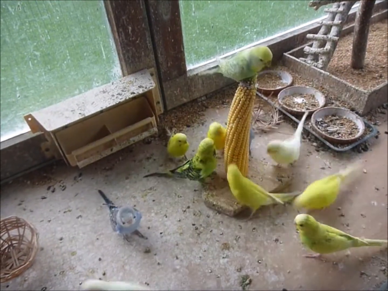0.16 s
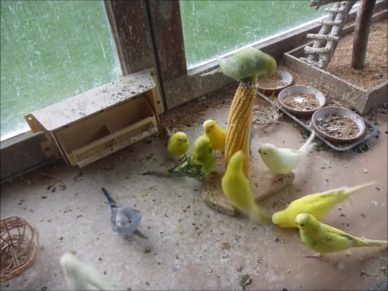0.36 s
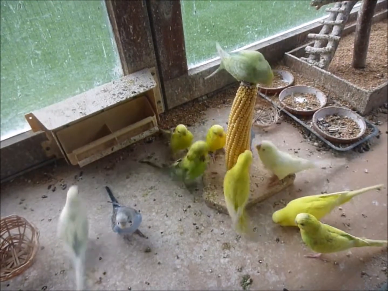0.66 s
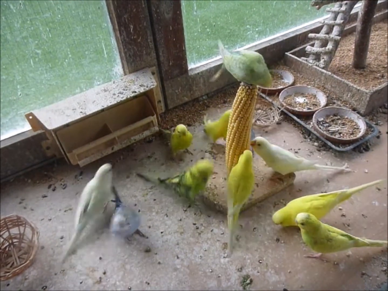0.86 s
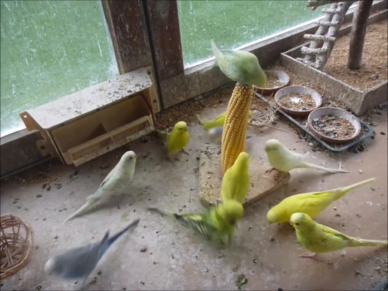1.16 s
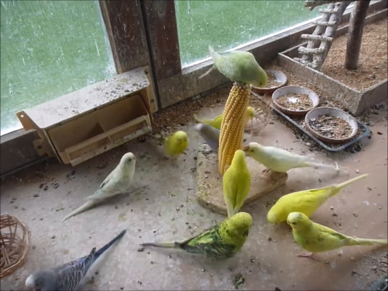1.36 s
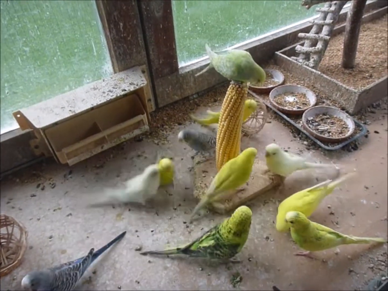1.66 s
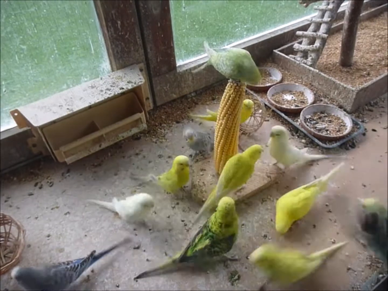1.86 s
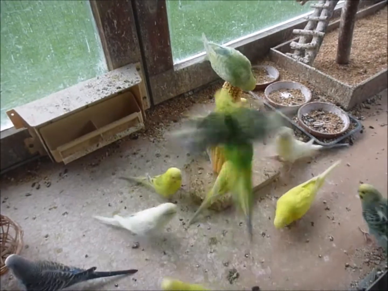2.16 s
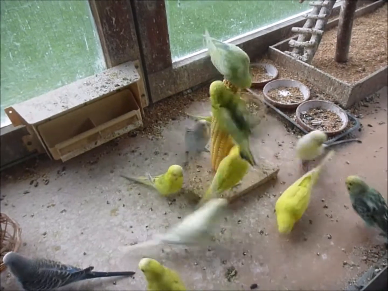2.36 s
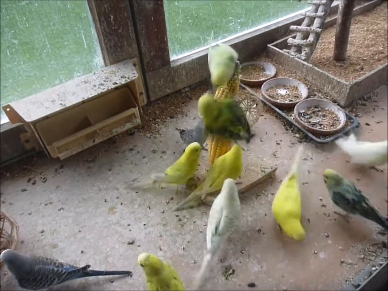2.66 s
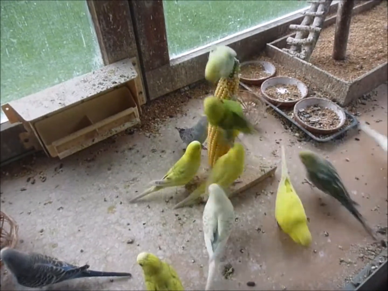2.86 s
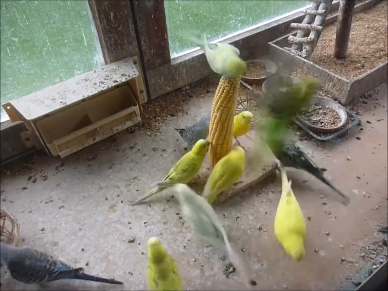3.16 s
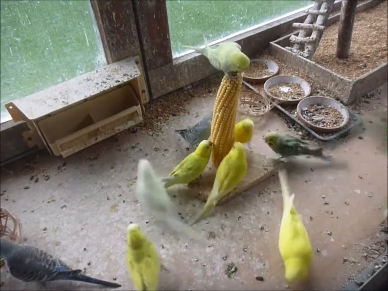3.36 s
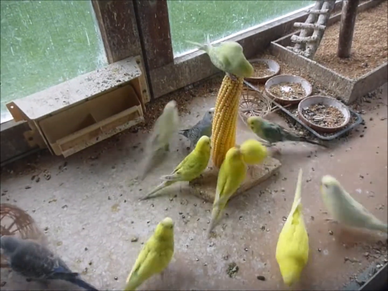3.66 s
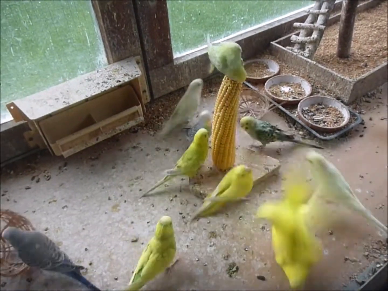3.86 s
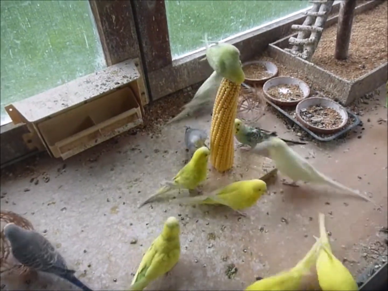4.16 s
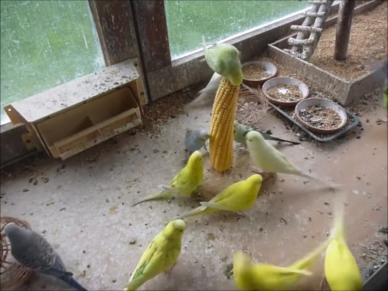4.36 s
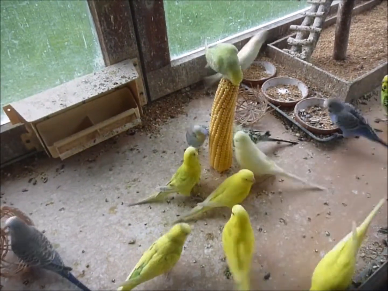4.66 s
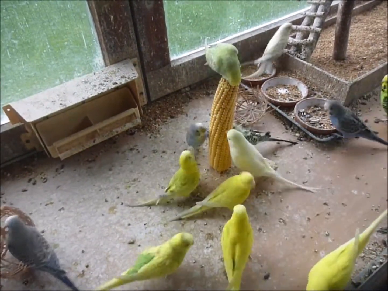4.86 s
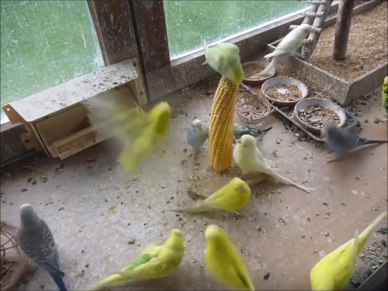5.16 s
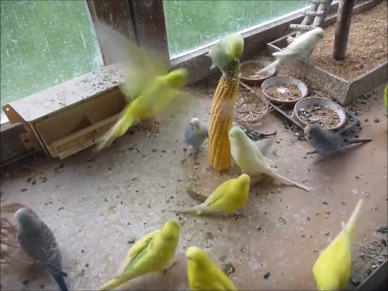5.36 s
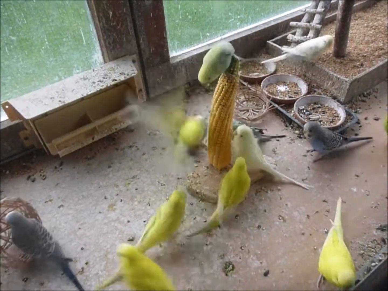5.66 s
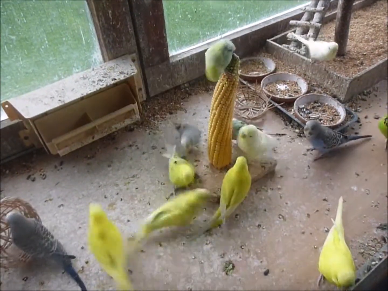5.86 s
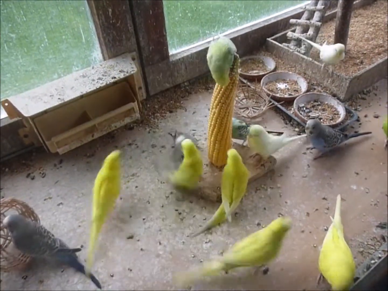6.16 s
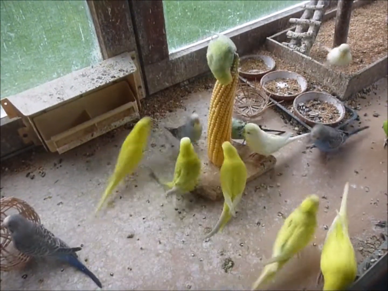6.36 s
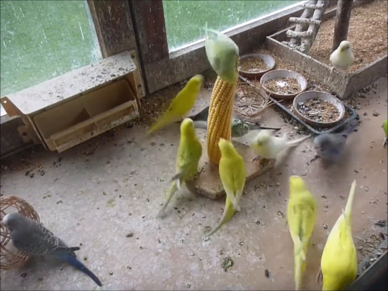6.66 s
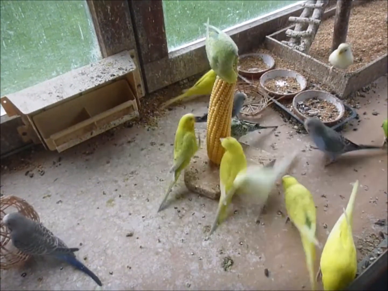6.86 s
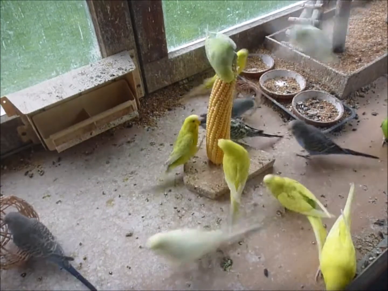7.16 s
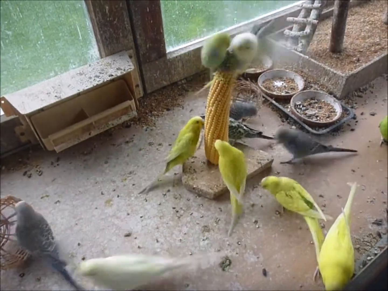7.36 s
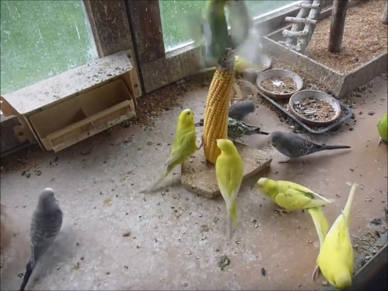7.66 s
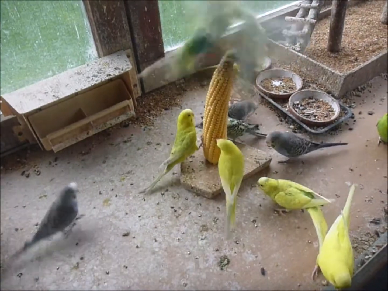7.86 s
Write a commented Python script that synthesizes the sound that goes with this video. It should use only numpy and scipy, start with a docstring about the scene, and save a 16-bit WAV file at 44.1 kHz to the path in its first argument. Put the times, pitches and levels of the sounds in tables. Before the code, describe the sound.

Close, nearly mono indoor pickup of small parrots feeding. Rapid scratchy chirps and bright gliding whistles crowd over a continuous far warble, faint pecking ticks, feather shuffle and quiet room air. Fluttering flights pass, strongest around three seconds and at the end, with low air gusts and light knocks. After seven seconds the flock sinks, leaving sparse short nasal calls and a firm landing thump.

```python
"""Budgerigars squabble around a corn cob on the floor of a small indoor aviary, heard almost in mono.
From the first moment a far flock warbles over faint room air, feather shuffle and pecking; close by,
rasps and gliding whistles overlap. Landings soon knock, and flights whirr and push low gusts of air.
Nasal yelps join after 2.5 s and are the last near calls, as the flock sinks and a hard landing knocks.
Calls are pitch-swept oscillators, wings and air are shaped noise; hard walls add a short echo."""
import sys
import numpy as np
from scipy import signal
from scipy.fft import rfft, irfft, next_fast_len
from scipy.io import wavfile

SR = 44100
rng = np.random.default_rng(int(sys.argv[2]) if len(sys.argv) > 2 else 0)


def to_wav(sig):
    """Store sig (one row per channel, or 1-D mono) as 16-bit WAV at the path in sys.argv[1].

    Samples outside -1..1 are clipped; the rate is SR.
    """
    pcm = np.clip(np.atleast_2d(sig), -1, 1) * 32767
    pcm = np.round(pcm).astype(np.int16)
    wavfile.write(sys.argv[1], SR, pcm.T)  # frames by channels


N = 354123
TIME = np.arange(N) / SR
EDGE_HZ = 15700  # top of the recorded band

# All event and flock levels are relative, ahead of the gains of the mix.
# near squawks: start_s, length_s, level_db, treble_db
NEAR_RASPS = [(0.005, 0.087, -27, -14), (0.128, 0.047, -21, -17), (0.434, 0.035, -22.5, -36),
              (0.637, 0.032, -24, -34.5), (0.759, 0.034, -21, -3), (0.847, 0.028, -15.5, -14),
              (0.929, 0.04, -21, -18), (0.983, 0.03, -18, -26.5), (1.039, .039, -19, -19.5),
              (1.098, 0.035, -19.5, -23), (1.157, 0.036, -19.5, -17.5), (1.217, .028, -18.5, -15),
              (1.264, 0.097, -22.5, -11.5), (1.383, 0.015, -16, -21), (1.411, 0.042, -20.5, -18),
              (1.502, .027, -17, -16), (1.555, 0.042, -20.5, -25.5), (1.625, 0.056, -20, -16.5),
              (1.703, 0.031, -20, -22.5), (1.911, 0.036, -24, -20), (1.954, .02, -17.5, -8),
              (2.033, 0.066, -18, -1.5), (2.239, 0.063, -19.5, -7.5), (2.334, 0.066, -20, -6.5),
              (2.475, 0.027, -26.5, 1.5), (2.536, .04, -19.5, -8), (2.676, 0.036, -22, -16),
              (2.741, 0.024, -26, -2.5), (2.791, 0.041, -20, -15), (3.071, 0.038, -21.5, -1),
              (3.315, 0.11, -25, -20.5), (3.447, .018, -20, -6.5), (3.667, 0.084, -23, -18),
              (3.828, 0.049, -21, -16), (3.92, 0.084, -21.5, -22), (4.04, 0.036, -18, -15),
              (4.08, 0.069, -20.5, -5.5), (4.236, 0.043, -24.5, -23), (4.374, 0.066, -21.5, 0),
              (4.547, 0.061, -20.5, 0), (4.651, 0.064, -18.5, 0), (4.741, 0.033, -20, -14),
              (4.829, 0.034, -17.5, -13), (4.874, 0.033, -25, -21.5), (4.929, .043, -20, -14.5),
              (4.994, .021, -17.5, -21), (5.052, .027, -20.5, -15), (5.179, 0.04, -18, -12.5),
              (5.384, 0.031, -19, -8.5), (5.438, 0.03, -19, -16), (5.479, 0.05, -18, -12.5),
              (5.56, 0.024, -23, -14), (5.607, 0.041, -22.5, -10), (5.721, 0.049, -21.5, -14),
              (5.802, .025, -18.5, -17), (5.828, 0.069, -26, -3), (5.948, .056, -21, -6),
              (6.075, .068, -25, -9), (6.163, 0.039, -21.5, -6.5), (6.243, 0.016, -23, -19),
              (6.29, .052, -24, -22), (6.38, 0.02, -22.5, -5), (6.436, 0.026, -21.5, -11),
              (6.486, 0.047, -21.5, -16.5), (6.713, 0.037, -27, -9.5), (7.072, .072, -17.5, -1.5),
              (7.231, 0.11, -29, -18)]
# near whistles: start_s, length_s, level_db, pitch_hz (middle), slide_octaves
NEAR_CHIRPS = [(0.005, .041, -23, 3440, .23), (0.047, .018, -17, 3730, 0.012),
               (0.086, .022, -22, 3890, -0.086), (0.17, 0.038, -21, 2520, -.24),
               (0.221, 0.078, -25.5, 3830, -0.29), (0.328, .061, -22.5, 2397, 0.13),
               (0.418, 0.032, -20, 2410, -0.31), (0.735, .039, -20.5, 2186, 0.06),
               (0.764, 0.019, -16, 2830, 0.12), (1.059, .02, -16, 3070, 0.65),
               (1.162, 0.047, -21, 2640, 0.12), (1.204, 0.048, -20.5, 2550, .39),
               (1.289, 0.048, -20, 3310, 0.43), (1.411, 0.04, -20.5, 2460, -0.25),
               (1.626, 0.032, -21, 2480, .24), (1.703, 0.027, -16.5, 2700, 0.57),
               (1.807, 0.021, -20, 3160, -0.025), (2.39, 0.066, -22.5, 2540, -0.2),
               (2.602, 0.064, -23.5, 3760, -.07), (2.688, 0.038, -21, 2700, -.18),
               (2.858, .028, -23, 2060, -0.43), (2.921, 0.024, -19.5, 2670, 0.34),
               (3.073, 0.084, -21.5, 2194, 0.24), (3.449, 0.013, -10, 2943, 0.26),
               (3.519, 0.024, -19, 2367, -0.2), (3.569, 0.032, -13, 2880, 0.098),
               (3.67, .025, -16, 2340, 0.34), (3.707, .042, -23.5, 3340, 0.11),
               (3.836, 0.032, -18.5, 2420, 0.36), (3.889, .033, -22.5, 2810, -0.21),
               (4.174, 0.048, -20, 2435, 0.14), (4.224, 0.052, -18, 2553, -0.051),
               (4.303, 0.035, -20.5, 3685, 0.13), (4.4, 0.064, -19.5, 2520, -0.17),
               (4.461, 0.053, -23.5, 2980, -0.34), (4.505, 0.0715, -20.5, 2300, 0.257),
               (4.724, 0.068, -24, 2420, -0.092), (4.918, 0.04, -20, 2530, 0.42),
               (5.051, 0.024, -16, 2370, -0.37), (5.2, 0.027, -16.5, 2644, -0.34),
               (5.554, 0.029, -15.5, 3195, 0.39), (5.578, 0.048, -18, 2880, -.29),
               (5.88, 0.066, -19, 2430, -0.14), (6.034, 0.035, -16, 2630, -0.16),
               (6.101, .048, -19, 3117, .22), (6.164, 0.033, -18.5, 3130, -.06),
               (6.312, 0.021, -19.5, 2453, 0.17), (6.482, 0.031, -16, 3190, 0.097),
               (7.291, 0.042, -19.5, 2355, 0.15), (7.317, .026, -13.5, 3610, 0.025),
               (7.341, .032, -17, 3150, -.12)]
# near nasal notes: start_s, length_s, level_db, pitch_hz (middle), slide_octaves, overtones_db
NEAR_YELPS = [(2.479, .03, -24.5, 2198, 0.042, 0), (2.611, .016, -22.5, 2010, .19, -15),
              (2.737, .021, -27, 1630, 0.69, 0), (3.08, 0.0284, -29.5, 2120, -.08, -2),
              (3.641, .015, -31.5, 3070, -0.2, 5.5), (4.377, .03, -23, 3150, -.26, -3),
              (6.375, .026, -25, 2300, -.15, -7), (6.677, 0.0296, -34, 3046, 0.12, -0.5),
              (6.729, 0.097, -46, 2750, -.02, 6), (6.922, 0.151, -35, 1190, 0.082, -9),
              (7.424, 0.0258, -25, 1984, 0.2, -8), (7.49, 0.0362, -22, 2151, 0.168, -3),
              (7.572, 0.011, -35.5, 2010, -0.32, 4), (7.696, .019, -27.5, 2600, 0.38, -3),
              (7.829, .027, -32.5, 2805, 0.12, 2.5), (7.96, 0.0346, -35.5, 3360, 0.099, 5),
              (8.02, 0.0136, -30, 3620, .17, -1)]
# birds landing and bumping into things: start_s, level_db, ring_hz
LANDINGS = [(0.051, -19.5, 208), (2.875, -24, 269), (3.163, -14, 452), (5.299, -19.5, 455),
            (7.437, -20, 217), (7.951, -9.5, 263)]
# short flights and flurries of wings: start_s, build_up_s, length_s, level_db, draught_share_db
WING_FLIGHTS = [(0.298, 0.12, 1.22, -38, -12), (1.488, .15, 0.31, -29, -12.5),
                (2.054, .08, 0.098, -33.5, -11), (3.097, .22, .33, -24, -14),
                (4.03, 0.11, 0.39, -38.5, -1.5), (5.134, 0.16, 0.28, -36.5, -11),
                (6.33, 0.091, 0.63, -41, -22), (7.494, 0.13, 0.62, -25.5, -12.5)]
# loudness of the rest of the flock: time_s, level_db
FLOCK_LEVEL = [(0, -26), (0.6, -25.5), (1.2, -24.5), (1.8, -23.5), (2.2, -26), (4.3, -25), (4.63, -29),
               (5.25, -24), (5.68, -27.5), (6.8, -27), (7.2, -35), (8.03, -33)]
# spectrum let out by the beak: frequency_hz, relative_db
BEAK_SPECTRUM = [(350, -8.5), (800, -5.5), (1250, 1.5), (1650, -1.5), (2300, 7), (4400, -0.5),
                 (6700, -12.5), (7900, -17), (11200, -33.5), (13000, -40.5), (16000, -39)]
# spectrum of air stirred by wings: frequency_hz, relative_db
WING_SPECTRUM = [(25, -40), (50, -31), (70, -11), (110, -6), (160, -4), (280, 0), (560, -0.5), (750, -4.5),
                 (1200, -10), (3000, -21.5), (15000, -44)]
# low air pushed out by the wings: frequency_hz, relative_db
DRAUGHT_SPECTRUM = [(25, -42), (48, -24), (70, 1), (105, -9), (150, -5), (260, -12), (500, -41),
                    (2000, -77)]
# blurred voices of the farthest birds: frequency_hz, relative_db
MURMUR_SPECTRUM = [(300, -23), (900, -2.5), (2400, 1.5), (5000, -22), (9000, -22.5), (15000, -55)]
# still air of the room: frequency_hz, relative_db
AIR_SPECTRUM = [(30, -40), (90, -11), (155, 0), (320, -1), (800, -9.5), (3000, -36.5)]
# decay time of the aviary: frequency_hz, t60_s
ROOM_DECAY = [(200, 0.23), (2000, 0.3), (12000, 0.24)]
# narrow dips in the microphone's response: frequency_hz, sharpness_q
MIC_NOTCHES = [(2890, 31), (7850, 67), (11700, 7.7)]

# throat resonance at 0 dB treble; duller squawks have a higher one, with random spread
THROAT_HZ, THROAT_OCTAVES_PER_DB, THROAT_SPREAD_OCTAVES = 3001, -0.0823, .06
# the ends of a note lie this far under a straight slide
CHIRP_ARCH_OCTAVES, YELP_ARCH_OCTAVES = 0.048, 0.024
# a squawk sags as the bird runs out of push
SAG_DB_PER_S = 23
# least share of roughness, and the length scale over which squawks grow harsher
HARSH_MIN, HARSH_SCALE_S = .26, .07
# chance that a far bird whistles rather than squawks, and the level of the blur
FAR_WHISTLERS, MURMUR_DB = .4, -12
# dying away of a flight, and the constant shuffling of feathers
SETTLE_S, SHUFFLE_DB = 0.068, -56


def amp(db):
    """Decibels to gain."""
    return 10 ** (np.asarray(db) / 20)


def unit(x):
    """Scales to rms 1."""
    return x / np.sqrt(np.mean(x ** 2) + 1e-20)


def read(points, hz):
    """Reads a spectrum on a log-frequency axis."""
    f, value = np.transpose(points)
    return np.interp(np.log(hz + 1), np.log(f + 1), value)


def follow(curve):
    """Gain at every sample from a level curve."""
    return amp(np.interp(TIME, *np.transpose(curve)))


def add(mix, s, sound):
    """Mixes a sound in at time s."""
    part = mix[max(round(s * SR), 0):][:len(sound)]
    part += sound[:len(part)]


def colour(x, points):
    """Filters x by a spectrum, at rms 1."""
    size = next_fast_len(len(x))
    gain = amp(read(points, np.fft.rfftfreq(size, 1 / SR)))
    return unit(irfft(rfft(x, size) * gain, size)[:len(x)])


def wander(t, rate):
    """A random curve with about rate new values a second."""
    knots = rng.standard_normal(4096)
    return np.interp(t * rate, np.arange(len(knots)), knots)


def resonate(x, hz, width):
    """A resonance of gain 1, width in Hz, that follows the curve hz."""
    turn = np.exp(2j * np.pi * np.cumsum(hz * np.ones(len(x))) / SR)
    r = np.exp(-np.pi * width / SR)
    # shift the resonance to 0 Hz, smooth there, and shift back
    return 2 * (turn * signal.lfilter([1 - r], [1, -r], x / turn)).real


def syllable(length, rise, fall):
    """Time and loudness of one syllable: it swells, holds and dies away."""
    t = np.arange(0, max(length, .005) + 2 * fall, 1 / SR)
    swell = np.sin(np.pi / 2 * np.minimum(t / rise, 1)) ** 2
    return t, swell / (1 + np.exp(4 * (t - length) / fall))


def glide(t, length, pitches):
    """A pitch arch through start, middle and end."""
    return np.polyval(np.polyfit([0, .5, 1], pitches, 2), np.minimum(t / length, 1))


def arched(hz, slide, arch):
    """Start, middle and end pitch of a note that slides and arches."""
    return hz * 2 ** np.array([-slide / 2 - arch, 0, slide / 2 - arch])


def bounce(x):
    """Floor and window return each call after short delays, drawn for where the bird stands."""
    out = x.copy()
    for delay_s, strength in zip(rng.uniform(.0004, .0035, size=2), (.6, .4)):
        add(out, delay_s, strength * x)
    return out * np.std(x) / np.std(out)


def calls(voice, table, lead_s):
    """Plays every row of a table with one kind of voice; each swells from just before its time."""
    out = np.zeros(N)
    for s, *row in table:
        add(out, s - lead_s, voice(*row))
    return out


def chirp(length, db, *pitches, waver=.038, buzz=.045, flutter_db=2.5):
    """A gliding whistle, shaken by a fast trill of the syrinx."""
    t, shape = syllable(length, rise=0.0049, fall=0.0086)
    trill_hz = rng.uniform(164.4, 424.3) * (1 + 0.235 * wander(t, 148))
    trill = np.sin(2 * np.pi * np.cumsum(trill_hz) / SR)
    hz = glide(t, length, pitches) * (1 + waver * wander(t, 436.4) + buzz * trill)
    tone = np.sin(2 * np.pi * np.cumsum(hz) / SR)
    return amp(db) * shape * unit(tone * (1 + .4 * trill) * amp(flutter_db * wander(t, 220)))


def rasp(length, db, throat_hz, treble_db, arch=.4, width_hz=700, throat_db=0, uneven_db=4, treble_s=0.016):
    """A swooping squawk: the syrinx vibrates unsteadily, chopped by its own rattle, under a moving throat."""
    t, shape = syllable(length, rise=0.008, fall=0.0055)
    through = np.minimum(t / length, 1)
    bend = np.sin(np.pi * (through + rng.uniform(-.4, .2)))
    swoop = np.exp(arch * rng.uniform(0.5056, 1) * (bend - bend.mean()))
    # short squawks stay more voiced, long ones break up
    harsh = np.clip(HARSH_MIN + (length / HARSH_SCALE_S) ** 2, 0, 1)
    voice_hz = throat_hz / rng.choice([2, 2, 3]) / (1 + .5 * harsh)
    jitter = np.exp(.05 * wander(t, 260) + .13 * harsh * wander(t, 1100))
    hz = voice_hz * swoop * jitter
    phase = 2 * np.pi * np.cumsum(hz) / SR
    buzz = unit(sum(np.cos(k * phase + k * k) * (k * hz < EDGE_HZ) for k in range(1, 15)))
    rattle_hz = 310 * np.exp(.3 * wander(t, 300))
    rattle = 1 + (.35 + .35 * harsh) * np.sin(2 * np.pi * np.cumsum(rattle_hz) / SR)
    breath = (.1 + .25 * harsh) * rng.standard_normal(len(t))
    drive = rattle * (buzz + breath)
    throat = amp(throat_db) * resonate(drive, throat_hz * swoop, width_hz)
    voice = colour(drive + throat, BEAK_SPECTRUM)
    # each turn of the head colours the call anew
    bands = np.geomspace(1000, EDGE_HZ, num=16)
    tint_db = read([(3900, -16.5), (6200, treble_db)], bands) + uneven_db * rng.uniform(-1, 1, len(bands))
    voice = colour(voice, np.transpose([bands, tint_db]))
    # the treble swells and fades with the opening of the beak
    dull = signal.sosfiltfilt(signal.butter(2, 4300, fs=SR, output="sos"), voice)
    gape = np.sin(np.pi * np.clip(t / (length + treble_s), 0, 1))
    return bounce(amp(db + 2 * wander(t, 120)) * shape * (dull + gape * (voice - dull)))


def far_flock(count=260, chirps_db=-4):
    """The rest of the flock chirps and squawks at random; the farthest voices blur into a murmur."""
    out = np.zeros(N)
    for k, (when, long, loud, pitch, bend, kind) in enumerate(rng.random((count, 6))):
        hz, length, slide = 1500 + 2500 * pitch, 0.01818 + .03 * long, 0.337 * (bend - .5)
        if kind < FAR_WHISTLERS:
            call = chirp(length, 6 * loud, hz * (1 - slide), hz, hz * (1 + slide))
        else:
            call = rasp(length, 8 * loud, hz, treble_db=-13.0)
        add(out, (k + 2 * when) / count * N / SR, call)
    murmur = colour(rng.standard_normal(N), MURMUR_SPECTRUM) * amp(2.7 * wander(TIME, 35) + MURMUR_DB)
    return follow(FLOCK_LEVEL) * (amp(chirps_db) * unit(out) + murmur)


def room_air(level_db=-43.5):
    """Still air of the room: steady, mostly low noise."""
    return amp(level_db) * colour(rng.standard_normal(N), AIR_SPECTRUM)


def pecks(per_s=22, level_db=-46):
    """Beaks and claws tick on seed husks and the floor: random, fast-dying noise bursts."""
    hits = (rng.random(N) < per_s / SR) * amp(20 * rng.random(N))
    t = np.arange(SR // 100) / SR
    tick = rng.standard_normal(len(t)) * np.exp(-t / 0.00091)
    return amp(level_db) * colour(signal.oaconvolve(hits, tick)[:N], BEAK_SPECTRUM)


def flight(s, build_s, length, db):
    """Loudness of a flight that builds up, holds and settles."""
    build = np.clip((TIME - s) / build_s, 0, 1)
    return amp(db) * build * np.exp(-np.maximum(TIME - s - length, 0) / SETTLE_S)


def wing_effort():
    """Loudness of all flights, over a faint shuffling of feathers."""
    return amp(SHUFFLE_DB) + sum(flight(*row[:4]) for row in WING_FLIGHTS)


def wings(beats_per_s=18, thrum_hz=420, thrum_width_hz=105, thrum_db=-3):
    """Each wing stroke pushes a puff of air and sets the flight feathers thrumming."""
    turns = np.cumsum(beats_per_s * np.exp(.3 * wander(TIME, 20))) / SR
    air = rng.standard_normal(N)
    hz = thrum_hz * np.exp(.05 * wander(TIME, 10))
    thrum = unit(resonate(resonate(air, hz, thrum_width_hz), hz, thrum_width_hz))
    stroke = .4 + np.sin(np.pi * np.sqrt(turns % 1)) ** 4
    stroke = stroke * amp(2 * wander(TIME, 20))
    return wing_effort() * unit((colour(air, WING_SPECTRUM) + amp(thrum_db) * thrum) * stroke)


def near_rasp(length, db, treble_db):
    """A close squawk that sags in level; its throat resonance depends on its treble."""
    octaves = THROAT_OCTAVES_PER_DB * treble_db + THROAT_SPREAD_OCTAVES * rng.standard_normal()
    call = rasp(length, db, THROAT_HZ * 2 ** octaves, treble_db)
    return call * amp(-SAG_DB_PER_S * (np.arange(len(call)) / SR - length / 2))


def near_chirp(length, db, hz, slide):
    """A close whistle on one arched slide."""
    return chirp(length, db, *arched(hz, slide, CHIRP_ARCH_OCTAVES))


def bumps(decay=0.014, tick_db=-7, level_db=-2):
    """A landing gives a noisy tick, a knock and a short dull ring; decay in seconds."""
    out, t = np.zeros(N), np.arange(SR // 8) / SR
    for s, db, hz in LANDINGS:
        tick = amp(tick_db) * rng.standard_normal(len(t)) * np.exp(-t / 0.0016)
        knock = 2 * resonate(tick, 1000, 2 * hz)
        ring = np.sin(2 * np.pi * hz * t) * np.exp(-t / decay)
        add(out, s, amp(db + level_db) * (ring + .5 * tick + knock))
    return out


def draught(gust_db=2, gusts_per_s=16):
    """Wings that beat close by push low gusts of air at the microphone."""
    effort = sum(amp(share_db) * flight(*row) for *row, share_db in WING_FLIGHTS)
    return effort * colour(rng.standard_normal(N), DRAUGHT_SPECTRUM) * amp(gust_db * wander(TIME, gusts_per_s))


def yelp(length, db, start_hz, middle_hz, end_hz, second_db, slope_db=-2):
    """A nasal note with a ladder of harmonics, hoarse at its start."""
    t, shape = syllable(length, rise=0.0056, fall=0.0018)
    hoarse = np.exp(-t / .04)
    hz = glide(t, length, [start_hz, middle_hz, end_hz]) * (1 + (.008 + .025 * hoarse) * wander(t, 900))
    phase = 2 * np.pi * np.cumsum(hz) / SR
    # the ladder changes by slope_db an octave and is shaped by the beak
    upper = sum(amp(slope_db * np.log2(k) + read(BEAK_SPECTRUM, k * hz)) * np.sin(k * phase)
                for k in range(2, 7) if k * middle_hz < EDGE_HZ)
    scratch = .5 * hoarse * colour(rng.standard_normal(len(t)), BEAK_SPECTRUM)
    return amp(db) * shape * (unit(np.sin(phase)) + amp(second_db) * unit(upper) + scratch)


def near_yelp(length, db, hz, slide, overtones_db):
    """A close nasal note on one arched slide."""
    return yelp(length, db, *arched(hz, slide, YELP_ARCH_OCTAVES), overtones_db)


def aviary(x, early_db, tail_db):
    """Floor and window answer first, then a short diffuse tail."""
    size = SR // 2
    sparse = (rng.random(size) < 4000 / SR) * (np.arange(size) > .007 * SR)
    taps = rng.choice([-1., 1.], size) * sparse
    # each frequency of the tail dies away at its own rate
    hz, t, z = signal.stft(taps, SR, nperseg=256)
    tail = signal.istft(z * amp(-60 * t / read(ROOM_DECAY, hz)[:, None]), SR, nperseg=256)[1]
    echo = amp(tail_db) * tail / np.linalg.norm(tail)
    early_at = (SR * rng.uniform(.001, .014, size=8)).astype(int)
    echo[early_at] += amp(early_db) * rng.choice([-1, 1], size=8)
    echo[0] += 1  # direct sound
    return signal.oaconvolve(x, echo / np.linalg.norm(echo))[:N]


def stereo_width(mid, width_db=-28):
    """A faint delayed copy for the two channels in opposite sign, mostly in the treble."""
    side = np.zeros(N)
    reflection = colour(mid, [(100, 7.5), (900, 4.5), (2600, 2.5), (8000, 18)])
    add(side, .005, amp(width_db) * np.std(mid) * reflection)
    return side


def scene():
    """Far flock, near birds and wings in one room, heard almost in mono."""
    mid = amp(3.5) * aviary(far_flock(), early_db=-15.5, tail_db=-6)
    mid += room_air()
    mid += aviary(pecks() + wings() + bumps() + draught(), early_db=-19, tail_db=-5.0)
    mid += amp(2.5) * aviary(calls(near_rasp, NEAR_RASPS, lead_s=.004), early_db=-19, tail_db=-7)
    mid += amp(0.5) * aviary(calls(near_chirp, NEAR_CHIRPS, lead_s=0.002008), early_db=-12, tail_db=-10)
    mid += amp(6) * aviary(calls(near_yelp, NEAR_YELPS, lead_s=0.001035), early_db=-12.5, tail_db=-8)
    side = stereo_width(mid)
    return np.array([mid + side, mid - side])


def record(dry, peak_hz=12600, peak_q=12, peak_db=5):
    """The microphone has narrow notches and one high resonance; then the band limit."""
    out = dry + amp(peak_db) * signal.lfilter(*signal.iirpeak(peak_hz, peak_q, SR), dry)
    for hz, q in MIC_NOTCHES:
        out = signal.lfilter(*signal.iirnotch(hz, q, SR), out)
    return signal.oaconvolve(out, signal.firwin(511, EDGE_HZ, window=("kaiser", 9), fs=SR)[None], "same")


dry = scene()
out = record(dry)
to_wav(out)
```